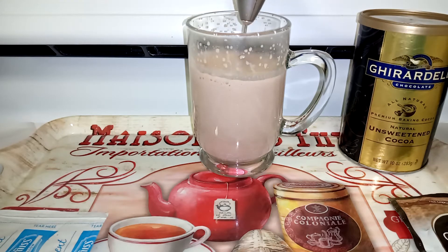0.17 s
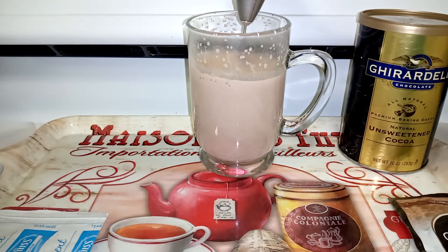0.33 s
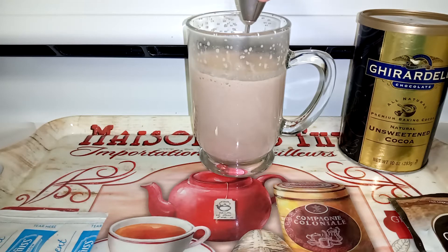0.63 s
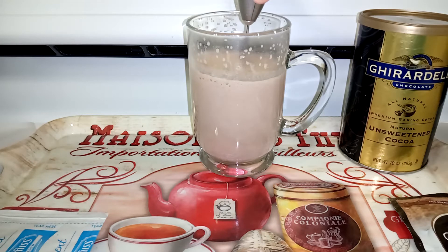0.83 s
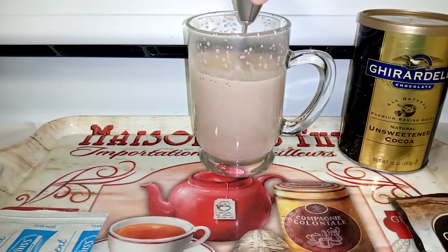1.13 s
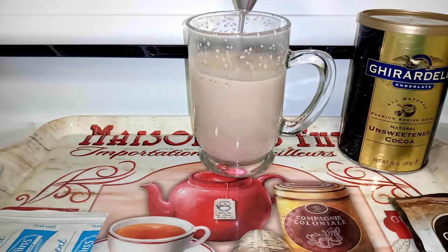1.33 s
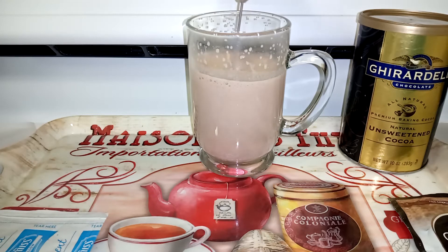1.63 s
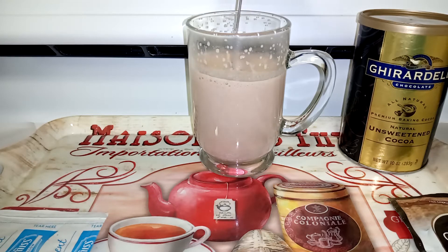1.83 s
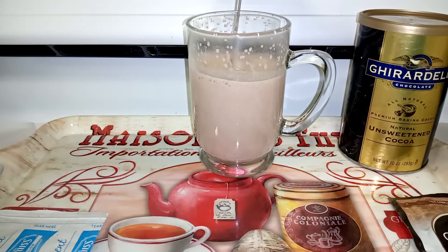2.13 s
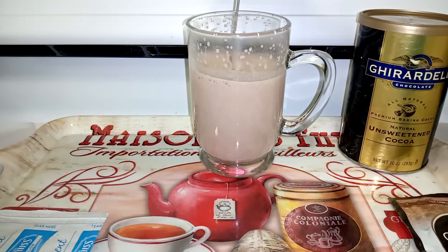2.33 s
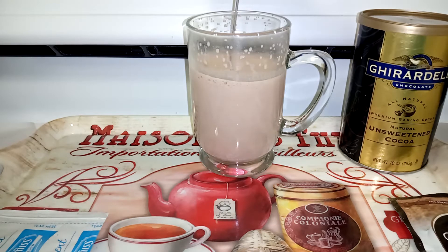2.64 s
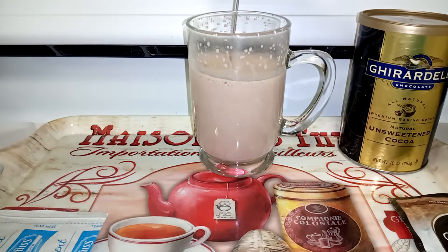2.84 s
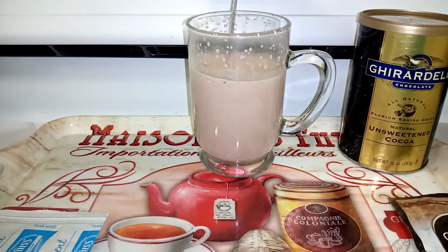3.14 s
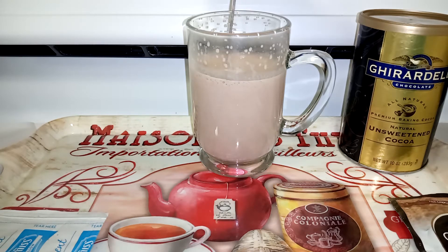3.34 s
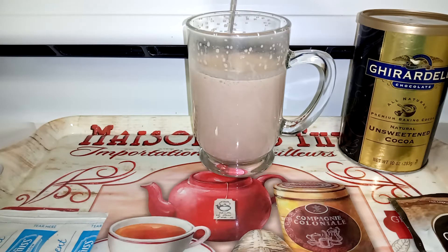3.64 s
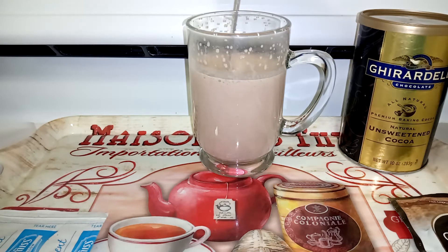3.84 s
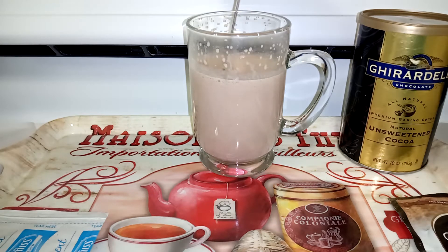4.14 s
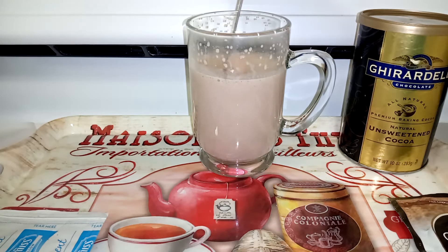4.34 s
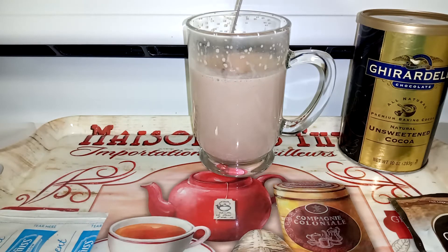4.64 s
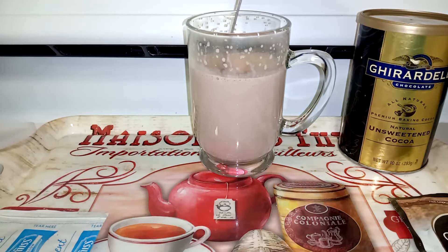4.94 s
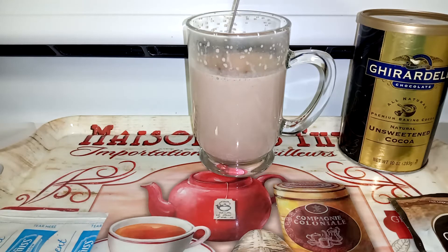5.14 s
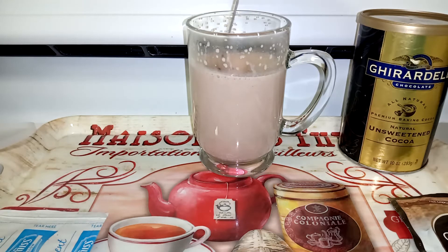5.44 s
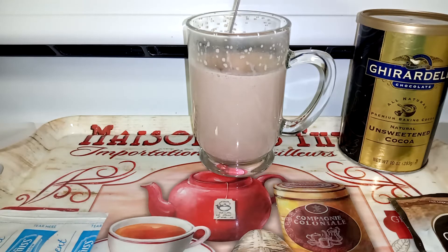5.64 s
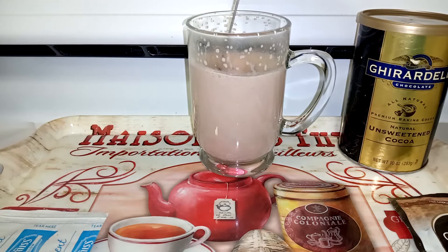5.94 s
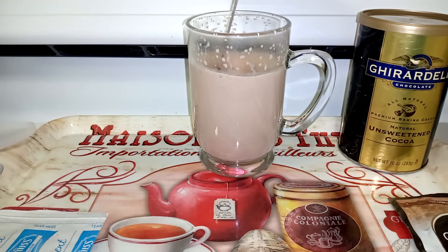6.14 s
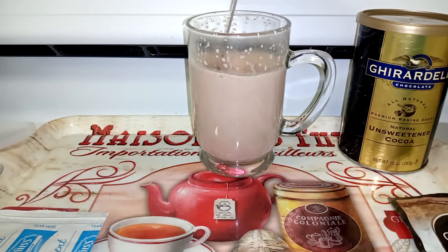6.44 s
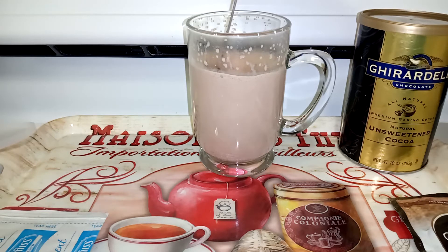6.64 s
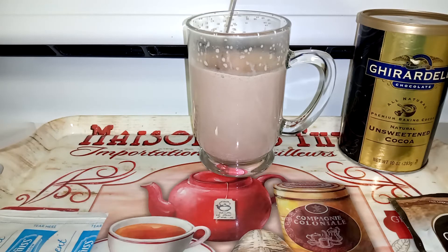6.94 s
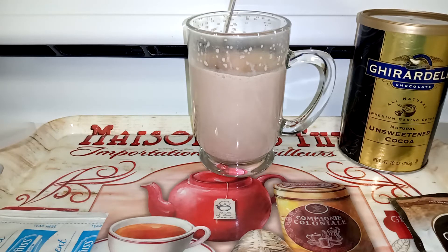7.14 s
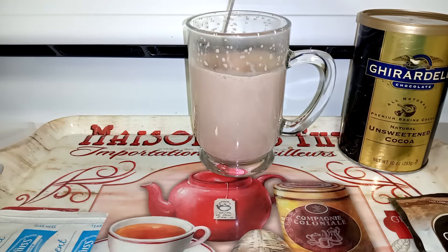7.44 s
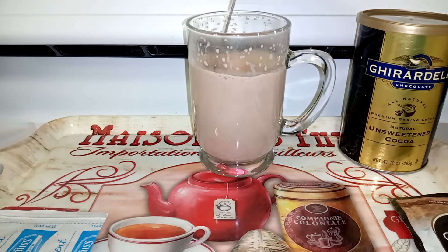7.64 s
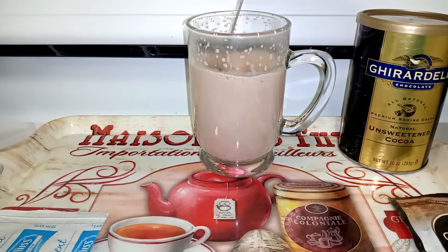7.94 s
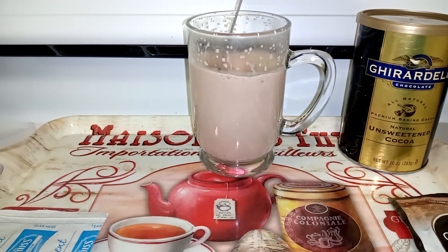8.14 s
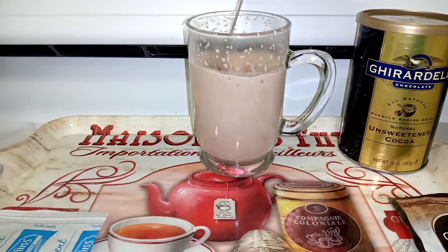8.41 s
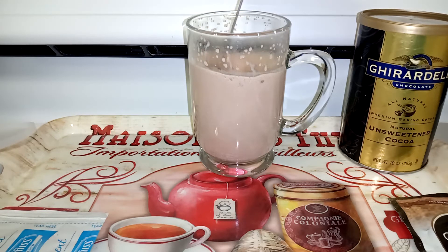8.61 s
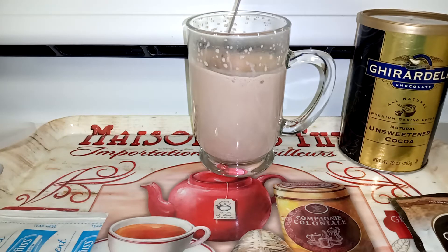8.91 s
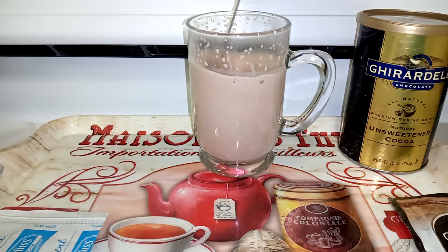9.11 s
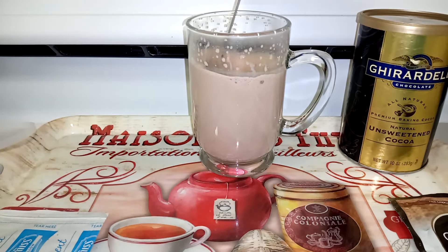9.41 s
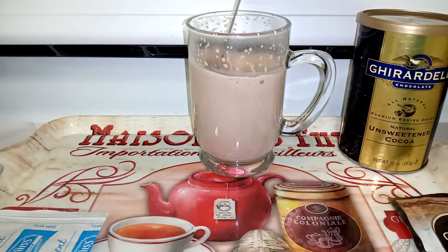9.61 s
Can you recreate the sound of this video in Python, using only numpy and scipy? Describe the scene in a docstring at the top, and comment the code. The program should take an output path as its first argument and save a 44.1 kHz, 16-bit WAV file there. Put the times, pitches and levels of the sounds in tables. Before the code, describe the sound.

A battery milk frother is already running in a glass mug, close to the microphone in a quiet kitchen with low rumble and steady appliance hum. From 0 to 0.6 seconds it gives a raspy, bright buzz with a thin high squeak. Between 0.6 and 1.8 it is pressed down: the tone roughens and wavers, short bearing squeals chirp, and one light tap on glass clicks near 0.7. Around 1.8 it is lifted; the buzz grows clearer and louder, pitch sinks slightly, and a singing whine holds until about 4, with soft low gulps and sloshes. At 4.3 to 4.5 wet splashes burst, with more near 4.8. From then on bubbles hiss and gurgle, the motor climbs unevenly in pitch, the whine fades, and the shaft rattles rapidly. Scattered drops plop near 6, 8.3 and 9; speed rises most after 8.6, still running at the end, near 9.8.

```python
"""A battery milk frother spins in a glass mug of milk in a quiet kitchen.
First it is pushed down: worn-in brush scratches excite the case, the bearing squeals, the coil taps the glass.
Lifted to mid depth, the loaded motor sings at multiples of its speed while the vortex gulps air.
After four seconds the whisk draws in air: bursting bubbles churn, the motor speeds up and the shaft knocks.
Throughout, noise-made rumble and steady sine lines of kitchen appliances lie behind it."""
import sys
import numpy as np
from scipy import signal
from scipy.fft import rfft, irfft
from scipy.io import wavfile
from scipy.ndimage import uniform_filter1d, map_coordinates

SR = 44100
rng = np.random.default_rng(int(sys.argv[2]) if len(sys.argv) > 2 else 0)


def materialize(psi):
    """Save the field psi as 16-bit PCM at rate SR to the path in sys.argv[1].

    A 1-D psi becomes a single channel; in a 2-D psi each row is a channel.
    """
    bounded = np.clip(np.atleast_2d(psi).T, -1, 1)
    quanta = np.round(bounded * 32767).astype(np.int16)
    wavfile.write(sys.argv[1], SR, quanta)


N = 430857
TIME = np.arange(N) / SR
TAPS = 8192
BINS = np.fft.rfftfreq(TAPS, 1 / SR)  # Hz

# damping of the case while the whisk is pushed down into the milk [t/s, share 0-1]
DAMPED = [(.55, 0), (.75, .8), (1.1, 1), (1.5, .6), (1.9, 0)]
# relative spectrum of the spray of milk beaten with air [f/Hz, level/dB per Hz]
FROTH = [(200, -13), (700, -8.5), (1300, -7.5), (2000, -9), (3000, 1.5), (4200, -8.5), (5200, -1),
         (7000, -13), (10000, -14), (12000, -21), (13600, -26), (15300, -22)]
# resonances of the air in the mug above the milk [f/Hz, width/Hz, level/dB]
MUG = [(950, 165, -3.5), (1186, 72, 2.5), (1396, 85, 1), (1627, 66, -0.5), (1930, 130, -5)]


def gain_of(db):
    """Level to amplitude: 20 dB is a factor of ten."""
    return 10 ** (np.asarray(db) / 20)


def evened(x):
    """Normalization of mean power: scales to rms 1."""
    return x / np.sqrt(np.mean(x ** 2) + 1e-20)


def steadied(x, size=8000):
    """Normalization of short-time power: holds the running rms near 1."""
    power = uniform_filter1d(uniform_filter1d(x ** 2, size), size)
    return x / np.sqrt(power + 1e-20)


def curves(rows):
    """Linear interpolation in time: the columns of a table of (s, ..) rows at every sample."""
    s, *columns = np.transpose(rows)
    return [np.interp(TIME, s, column) for column in columns]


def wander(rate_hz, size=4096):
    """Low-passed noise: slow random fluctuation of rms 1."""
    hz = np.fft.rfftfreq(size, TIME[-1] / size)
    spectrum = rfft(rng.standard_normal(size)) / (1 + (hz / rate_hz) ** 4)
    slow = irfft(spectrum, size)
    return evened(np.interp(TIME, np.linspace(0, TIME[-1], size), slow))


def colour(x, gain):
    """Minimum-phase, hence causal, filtering by a gain on BINS; the result has rms 1."""
    log_gain = np.log(np.maximum(gain / gain.max(), 1e-5))
    circle = np.r_[log_gain, log_gain[-2:0:-1]]
    # the Hilbert transform of the log gain gives the minimum phase
    response = np.fft.ifft(np.exp(np.conj(signal.hilbert(circle)))).real
    return evened(signal.oaconvolve(x, response[:TAPS // 2])[:N])


def ring(x, gain):
    """Resonant filtering that keeps the loudness given by the gain's total power."""
    return np.linalg.norm(gain) * colour(x, gain)


def slope(points):
    """Spectral envelope through (Hz, dB) points, linear in dB over log frequency."""
    hz, db = np.transpose(points)
    return gain_of(np.interp(np.log(BINS + 1), np.log(hz), db))


def peaks(modes):
    """Power sum of independent (Hz, width, dB) resonances, as a gain on BINS."""
    power = sum(gain_of(db) ** 2 / (1 + ((BINS - hz) / width) ** 2 * 2) ** 2 for hz, width, db in modes)
    return np.sqrt(power)


def fine_modes(size=24):
    """High modal density: the many small resonances crowded between the main ones, as a gain."""
    ripple = evened(uniform_filter1d(uniform_filter1d(rng.standard_normal(len(BINS)), size), size))
    return gain_of(1.7 * ripple * np.clip(BINS / 5000, 0, 1))


def scratch(turns, crowding, bump_db, bump_width, bump_place=.9, count=5, size=4096, order=340):
    """Periodic friction: roughness met on every turn gives harmonics of the speed and slowly wears anew."""
    angle = np.arange(size) / size
    crossings = np.exp(crowding * np.cos(2 * np.pi * 6 * (angle - bump_place)))  # six in a turn
    # the rubbing is hardest once a turn
    bump = np.exp(-(np.sin(np.pi * (angle - bump_place)) / (np.pi * bump_width)) ** 2)
    lean = gain_of(bump_db * bump)
    z = rfft(rng.standard_normal((count, size)) * crossings * lean)[:, :order]
    # some high multiples of the speed stand out and glide with it
    favoured = evened(uniform_filter1d(rng.standard_normal((count, order)), size=2, axis=1))
    strength = gain_of(4.6 * favoured * np.minimum(np.arange(order) / 100, 1))
    # only the phases of the drawn roughness remain
    patterns = irfft(strength * z / abs(z), size) * np.sqrt(lean)
    wear, place = np.linspace(0, count - 1, N), turns % 1 * size
    return evened(map_coordinates(patterns, [wear, place], order=1, mode="grid-wrap"))


def motor_levels(faster, air, low):
    """Mechanical noise grows with speed; the shaft rattles more as the milk lets go of it (levels in dB)."""
    # how hard the brushes bear on the commutator as the hand shifts [t/s, level/dB]
    brush_pressure = [(1.6, 3.5), (2.1, 0), (3.6, 0), (6.8, 0.5), (7.5, -0.5), (8.1, 2), (9.2, 0),
                      (9.77, -1)]
    growth_db = .6531 * faster  # dB for each extra turn a second
    free_db, low_db = -3.5 * air, -5.5 * low  # running free; handle low over the mug
    buzz_db = -45 + growth_db + free_db + low_db + curves(brush_pressure)[0]
    swing = air / (air + .44)  # half its limit at an air share of 0.44
    rattle_db = -44 + .54 * faster + 20 * np.log10(swing + 1e-6)
    return buzz_db, rattle_db


def brushes(turns, level_db, air, unsteady, flicker_db=0.63):
    """Forced vibration: the scratch of three commutator bars rings each bar's share of the case's modes."""
    # resonances of the motor case
    # [f/Hz, width/Hz, loaded level/dB, pressed-down level/dB, running-free level/dB]
    case_modes = [(2283, 57, 2.5, 5, 3), (2483, 118, -3, 9.5, -2), (2977, 163, -3, -2, 10.5),
                  (3347, 280, -4, 2, 3.5), (3795, 98, -10, -12, -2), (4586, 790, -15.5, -17, -8),
                  (5450, 150, -6, -3, -19), (6070, 820, -9, -6, -3), (6644, 117, -3, -5, -0.5),
                  (7133, 250, 0, -18, 1), (7590, 440, 1, -6, -27), (7640, 1280, -23, 1.5, -4.5),
                  (9560, 750, -12, -11, -12), (10130, 400, -10.5, -7.5, -11.5),
                  (11340, 900, -16.5, -12.5, -15), (15260, 1400, -29.5, -23, -17.5),
                  (8070, 140, -2, 1, -2.5), (8660, 93, -9, -2, -25)]
    pushed_db = -2
    states = np.zeros((3, N))  # under load, pressed down, running free
    ripples = [fine_modes() for _ in states]
    for bar in range(3):
        grit = scratch(turns, crowding=.55, bump_db=4.2, bump_width=.09, bump_place=1.1 - .2 * bar, count=14)
        # turns differ mostly in the treble
        grit = grit + unsteady * np.diff(grit * rng.standard_normal(N), prepend=0)
        grit = grit * gain_of(.6 * wander(40))
        hz, width, *levels = np.transpose(case_modes[bar::3])
        states += [ring(grit, ripple * peaks(zip(hz, width, db))) for ripple, db in zip(ripples, levels)]
    loaded, gripped, free = map(evened, states)
    damped, = curves(DAMPED)
    in_milk = (1 - damped) * loaded + damped * gripped
    buzz = steadied((1 - air) * in_milk + air * free)
    return gain_of(level_db + pushed_db * damped + flicker_db * wander(22)) * buzz


def singing(turns, speed, buzz_db, low, pushed, steady_db=1, waver_db=2.2):
    """Order tones: multiples of the speed sing under load, wavering when low, loudest at a handle mode."""
    # singing multiples of the speed
    # [multiple, pressed-down level/dB re the buzz, mid-depth level/dB re the buzz]
    orders = [(46, -18, -30), (48, -26, -18), (52, -16, -24), (57, -19, -18), (58, -9, -22), (60, -15, -30),
              (61, -18, -32), (64, -13, -9), (66, -8.5, -28), (67, -14, -30), (70, -19, -21),
              (72, -28, -18), (83, -34, -20), (117, -26, -12.5), (141, -19, -15), (143, -18, -18),
              (151, -16, -17), (159, -22, -13), (160, -20, -9), (161, -22, -14)]
    # how strongly the motor sings: most before the coil breaks the surface, hardly once free [t/s, level/dB]
    song_level = [(.7, -5), (1.1, -8.5), (1.6, -0.5), (2.2, -0.5), (3.3, -1.5), (3.9, -1.5), (4.5, -1),
                  (4.75, -5), (5.4, -12), (9.77, -39)]
    whine_hz, half_width_hz, boost = 3078, 30, 1.4  # the handle's sharpest resonance
    pressed = low * np.minimum(2 * pushed ** 2, 1)
    tones = np.zeros(N)
    for k, pressed_db, lifted_db in orders:
        strength = pressed * gain_of(pressed_db) + (1 - low) * gain_of(lifted_db)
        resonance = 1 + boost / (1 + ((k * speed - whine_hz) / half_width_hz) ** 2)
        slip = .09 * low * wander(9)  # in cycles of the tone
        waver = gain_of((steady_db + low * waver_db) * wander(19))
        tone = np.sin(2 * np.pi * (k * turns + slip + rng.random()))
        tones += strength * resonance * waver * tone
    return gain_of(buzz_db + curves(song_level)[0]) * np.sqrt(2) * tones


def rattle(turns, level_db, loose, damping=2.2, chatter_share=.55):
    """Impact excitation: a free shaft knocks once a turn with drifting lighter rebounds; a loaded one rubs."""
    # resonances of the handle that the shaft knocks on [f/Hz, width/Hz, level/dB]
    handle_modes = [(2350, 95, -18), (2445, 75, -12.5), (2850, 150, -9.5), (2956, 150, -6.5),
                    (3082, 52, 5.5), (3124, 64, 0), (3314, 71, -7)]
    # knocks of the shaft in each turn [place in the turn 0-1, level/dB]
    knock_rows = [(.08, -6), (.37, -13), (.55, -13), (.77, 0)]
    knocks = np.zeros(N)
    for place, db in knock_rows:
        drift = .004 * (db < 0) * wander(1.5)  # the main knock, at 0 dB, keeps its place
        offset = (turns - place - drift + .5) % 1 - .5
        knocks += gain_of(db) * np.exp(-(offset / .002) ** 2)
    chatter = scratch(turns, crowding=.3, bump_db=1, bump_width=.15, count=16)
    drive = evened(knocks * gain_of(.6 * wander(40))) + chatter_share * chatter
    ringing = evened(colour(drive, peaks(handle_modes)))
    damped_modes = [(hz, width * damping, db) for hz, width, db in handle_modes]
    rubbing = steadied(colour(chatter, fine_modes() * peaks(damped_modes)))
    return gain_of(level_db) * (np.sqrt(loose) * ringing + np.sqrt(1 - loose) * rubbing)


def squeak(turns):
    """Frictional excitation of bearing modes: chirps, strongest at first, hardest once a turn."""
    # level of the squeak [t/s, level/dB]
    squeak_level = [(0, -49), (.5, -49), (.7, -52), (.85, -72), (1.3, -68), (2, -59), (8, -66), (9.77, -72)]
    # resonances of the squeak [f/Hz, width/Hz, level/dB]
    bearing_modes = [(7760, 540, 1), (8280, 580, 2), (11400, 470, -10.5), (15100, 480, -11)]
    rub = scratch(turns, crowding=.9, bump_db=4.2, bump_width=.08)
    rub = rub * (1 + .25 * rng.standard_normal(N))
    chirps = steadied(colour(rub, fine_modes() * peaks(bearing_modes)))
    return gain_of(curves(squeak_level)[0]) * chirps


def squeals(turns, rough=0.42):
    """Friction on one mode: each shift of the hand leans the shaft on its bearing, which squeals briefly."""
    # squeals of the bearing [start t/s, end t/s, level/dB, f/Hz, width/Hz]
    squeal_rows = [(0.617, .78, -57, 7940, 250), (.73, .92, -57, 7050, 300), (.8, 1.17, -64, 10140, 220),
                   (0.97, 1.18, -60, 5800, 380), (1.16, 1.32, -51, 8000, 250.4),
                   (1.3, 1.85, -52, 7580, 300)]
    rub = scratch(turns, crowding=.7, bump_db=4, bump_width=.1)
    rub = rub * (1 + rough * rng.standard_normal(N))
    out = np.zeros(N)
    for start, end, db, hz, width in squeal_rows:
        progress = np.clip((TIME - start) / (end - start), 0, 1)
        swell = np.sqrt(abs(np.sin(np.pi * progress)))
        out += gain_of(db) * swell * steadied(colour(rub, peaks([(hz, width, 0)])))
    return out


def tap():
    """Free decay of struck modes: the coil touches the glass once and the milk damps the ring."""
    # what the tap rings [f/Hz, level/dB, t60/s]
    tap_modes = [(1540, -50, .05), (1680, -56, .17), (1850, -61, .08), (3230, -41, .045), (4330, -52, .02)]
    t = np.maximum(TIME - .7305, 0)  # s since the touch
    return sum(gain_of(db - 60 * t / t60) * np.sin(2 * np.pi * hz * t) for hz, db, t60 in tap_modes)


def bubbles(turns, per_s=3000):
    """Random impulses: tiny bubbles burst in a throb, as the coil breaks the surface once a turn."""
    sizes = gain_of(2.8 * np.minimum(rng.exponential(1, N), 4))
    bursts = rng.choice([-1, 1], N) * (rng.random(N) < per_s / SR)
    return sizes * bursts * gain_of(-2 * np.cos(2 * np.pi * turns))


def churning(turns, churn_db, spray_db=4, lumps_db=3.0):
    """Impulsive excitation of a cavity: lumps of torn-in air hiss, and each mug resonance gurgles on its own."""
    lumps = gain_of(lumps_db * np.tanh(wander(20)))
    spray = colour(bubbles(turns) * lumps, slope(FROTH))
    gurgle = np.zeros(N)
    for mode in MUG:
        own_swell = gain_of(4 * np.tanh(wander(11)))
        gurgle += ring(bubbles(turns) * lumps * own_swell, peaks([mode]))
    return gain_of(churn_db) * (evened(gurgle) + gain_of(spray_db) * spray)


def swirling(churn_db, with_churn_db=-7):
    """Bubble resonance: pockets of air swirl under the surface, louder while the milk churns."""
    # relative spectrum of milk swirling under its surface [f/Hz, level/dB per Hz]
    swirl_spectrum = [(300, -5), (650, 7), (900, -2.5), (1080, 2.5), (1300, 7), (1480, -5), (2000, -33),
                      (3000, -22), (16000, -42)]
    swirl = np.zeros(N)
    for hz in np.geomspace(680, 1600, num=11):  # each size of trapped bubble swells on its own
        swell = gain_of(6 * wander(9))
        swirl += ring(rng.standard_normal(N), slope(swirl_spectrum) * peaks([(hz, 50, 0)])) * swell
    calm = gain_of(-69.5 + 4.5 * wander(9.7))
    level = np.hypot(calm, gain_of(churn_db + with_churn_db))
    return level * steadied(swirl, size=4000)


def swells(rows, width_hz, length_s, size=16000):
    """Bubble resonance: pockets of air, as (s, dB, Hz), swell and ring at the pitch of their size."""
    t, out = (np.arange(size) - size // 2) / SR, np.zeros(N + size)
    for s, db, hz in rows:
        pocket = colour(rng.standard_normal(size), peaks([(hz, width_hz, 0)]))[:size]
        pocket = steadied(pocket, size=1500)
        out[round(s * SR):][:size] += gain_of(db) * np.exp(-(t / length_s) ** 2) * pocket
    return out[size // 2:][:N]  # each swell peaks at its listed time


def gulps():
    """Pitch falls with bubble size: the vortex swallows small pockets, wall sloshes trap larger, duller ones."""
    # gulps of the vortex [t/s, level/dB, f/Hz]
    gulp_rows = [(0.23, -66, 1070), (0.24, -65, 1270), (0.471, -68, 1230), (0.7, -70, 1310),
                 (1.02, -66, 1060), (2.39, -60, 1100), (2.48, -64, 990), (2.69, -63, 1050),
                 (2.919, -69, 1370), (3.18, -69, 1030), (3.22, -71, 1280), (3.49, -65, 1060),
                 (3.69, -63, 1074)]
    # milk sloshes against the wall [t/s, level/dB]
    slosh_rows = [(.35, -59.5), (.45, -59), (.72, -61), (.92, -60.5), (2.33, -60), (3.1, -58), (3.3, -69),
                  (3.62, -62), (3.75, -60), (4.0, -60.5), (4.7, -56), (5, -59), (5.25, -61), (5.43, -55),
                  (6.88, -60), (7.1, -55), (7.35, -53), (7.52, -54), (7.7, -55.5), (7.84, -58), (8.05, -57),
                  (8.33, -53), (8.55, -57)]
    slosh_hz = 695
    small = swells(gulp_rows, width_hz=55, length_s=.047)
    large = swells([(s, db, slosh_hz) for s, db in slosh_rows], width_hz=140, length_s=.055)
    return small + large


def splashes(size=9000):
    """Decaying bubble oscillation: a flung drop gives a puff of spray and a ringing pocket of air."""
    # splashes and drops in the mug [t/s, level/dB before the mix and soft start, f/Hz, t60/s, spray share 0-1]
    splash_rows = [(4.346, -35, 1640, 0.054, .9), (4.388, -30, 1190, 0.048, 0.94),
                   (4.432, -33, 1170, .034, 0.6), (4.45, -33, 1670, 0.041, .8),
                   (4.472, -37, 1170, 0.034, .6), (4.515, -35, 1350, 0.046, 1),
                   (4.76, -41, 1460, 0.036, 0.2), (4.8, -39, 1420, .033, 0.2),
                   (4.922, -35, 1070, 0.03, .84), (6.03, -37, 1180, 0.045, 0.43),
                   (8.289, -39, 1400, 0.046, 0.5), (8.308, -37, 1164, 0.069, 0.46),
                   (8.779, -39, 1187, 0.047, 0.5), (9.081, -39, 1180, 0.041, .4),
                   (9.134, -40, 1190, .05, .4)]
    attack_s, mug_db = .0008, 1  # softness of the start; how strongly spray rings the mug's air
    t, out = np.arange(size) / SR, np.zeros(N + size)
    spray = colour(rng.standard_normal(N), np.hypot(slope(FROTH), gain_of(mug_db) * peaks(MUG)))
    for s, db, hz, t60, share in splash_rows:
        at = round(s * SR)
        drop = (1 - share) * np.sin(2 * np.pi * hz * t) + .5 * share * spray[at:at + size]
        out[at:at + size] += gain_of(db - 60 * t / t60) * (1 - np.exp(-t / attack_s)) * drop
    return out[:N]


def walls(x, size=11000):
    """Diffuse reverberation: counter and walls return exponentially decaying noise."""
    t, t60 = np.arange(size) / SR, .25
    tail = rng.standard_normal(size) * gain_of(-60 * t / t60) * (t > .004)
    return signal.oaconvolve(x, tail / np.linalg.norm(tail))[:N]


def kitchen(rumble_db=-51.0, hum_db=-2.5, waver_rad=0.42, swell_db=2.5):
    """Broadband and tonal background: rumble of moving air and the gently wavering lines of appliances."""
    # relative spectrum of the kitchen rumble [f/Hz, level/dB per Hz]
    room_spectrum = [(20, -20), (38, -13), (55, -3), (85, -3), (102, 7), (135, -3), (190, 2), (330, 0),
                     (440, 1), (580, -6), (760, -16), (1000, -23), (1700, -30), (15000, -40)]
    # hum of mains, a compressor and a fan [f/Hz, level/dB before hum_db]
    hum_lines = [(59.1, -57.5), (102.1, -55), (119.9, -47.5), (204.2, -58.5), (236.3, -59), (239.8, -58.5),
                 (295.4, -65), (306.2, -59), (357, -63), (359.7, -61.5), (408.2, -63), (510.3, -55.5),
                 (612.3, -67), (695, -71)]
    rumble = colour(rng.standard_normal(N), slope(room_spectrum)) * gain_of(swell_db * wander(15.5))
    waver = waver_rad * wander(1.38)  # phase waver at 300 Hz, in proportion elsewhere
    hum = np.zeros(N)
    for hz, db in hum_lines:
        hum += gain_of(db) * np.sin(2 * np.pi * (hz * TIME + rng.random()) + waver * hz / 300)
    return gain_of(rumble_db) * rumble + gain_of(hum_db) * np.sqrt(2) * hum


def scene():
    """Common drive and superposition: one turning shaft paces motor and milk, and all sources add."""
    # motor speed before smoothing and tugs [t/s, turns a second]
    speed_rows = [(0.0, 49.66), (0.12, 50.13), (0.48, 50.2), (0.68, 49.3), (0.84, 50.04), (1.1, 50.44),
                  (1.24, 49.17), (1.32, 50.0), (1.48, 50.58), (1.64, 49.94), (1.9, 47.54), (2.12, 46.86),
                  (2.62, 47.22), (2.9, 46.72), (3.06, 46.91), (3.22, 46.69), (3.94, 47.27), (4.14, 48.14),
                  (4.24, 48.0), (4.58, 48.53), (4.78, 50.21), (4.96, 50.53), (5.14, 51.64), (5.24, 52.56),
                  (5.38, 52.85), (5.48, 54.38), (5.76, 54.29), (5.88, 55.06), (6.08, 54.33), (6.36, 56.12),
                  (6.52, 55.6), (6.74, 56.19), (6.84, 56.04), (7.04, 54.95), (7.56, 54.01), (7.82, 54.64),
                  (8.08, 56.51), (8.18, 56.97), (8.26, 56.95), (8.38, 56.27), (8.5, 56.6), (8.82, 59.51),
                  (8.94, 59.94), (9.02, 59.87), (9.14, 60.27), (9.38, 61.91), (9.54, 62.23), (9.78, 61.06)]
    # how far the whisk is out of the milk and drawing air [t/s, share 0-1]
    air_rows = [(.55, 0.12), (.85, 0.18), (1.5, 0.22), (2, 0.06), (3.3, 0.03), (3.8, 0.3), (4.3, 0.34),
                (4.55, 0.32), (4.75, 0.55), (5.3, 0.75), (9.77, 1)]
    # how hard the coil churns the surface [t/s, level/dB]
    churn_rows = [(4.3, -88), (4.34, -54.5), (4.52, -55.5), (4.62, -66), (4.74, -54.5), (5.4, -58),
                  (5.7, -55.5), (6.1, -57.5), (7.2, -55.5), (7.7, -55.5), (7.95, -58.5), (8.3, -54.5),
                  (8.6, -56), (8.85, -52), (9.2, -53.5), (9.77, -55.5)]
    inertia_s = .05  # the spinning milk smooths changes of speed
    usual_speed, top_speed = 50, 63.1  # turns a second: reference and end of the growth in noise
    lift_from_s, lift_to_s = 1.78, 1.87  # the handle is lifted away from the rim

    speed = uniform_filter1d(curves(speed_rows)[0], max(round(inertia_s * SR), 1))
    faster = np.minimum(speed, top_speed) - usual_speed
    air = np.clip(curves(air_rows)[0], 0, 1)
    pushed, = curves(DAMPED)
    unsteady = .34 + .55 * pushed + .32 * air  # of the milk's drag: always, pushed down, drawing air
    tug = .0024 * unsteady * wander(16)
    turns = np.cumsum(speed * (1 + tug)) / SR
    low = np.interp(TIME, [lift_from_s, lift_to_s], [1, 0])  # 1 while the handle is low over the mug
    loose = np.interp(air, [.31, .56], [0, 1])  # air shares where knocking starts and is full

    buzz_db, rattle_db = motor_levels(faster, air, low)
    motor = brushes(turns, buzz_db, air, unsteady) + singing(turns, speed, buzz_db, low, pushed)
    motor += rattle(turns, rattle_db, loose) + squeak(turns) + squeals(turns)
    churn_db, = curves(churn_rows)
    milk = churning(turns, churn_db) + swirling(churn_db) + gulps() + splashes()
    frother = motor + tap() + milk
    echo = gain_of(-11) * walls(frother)
    return (frother + echo + kitchen())[None]


def record(dry):
    """Band limitation: a linear-phase low-pass sets the recorder's upper edge."""
    edge_hz = 15750
    low_pass = signal.firwin(511, edge_hz, window=("kaiser", 9), fs=SR)
    return signal.oaconvolve(dry, low_pass[None], "same")


dry = scene()
out = record(dry)
materialize(out)
```